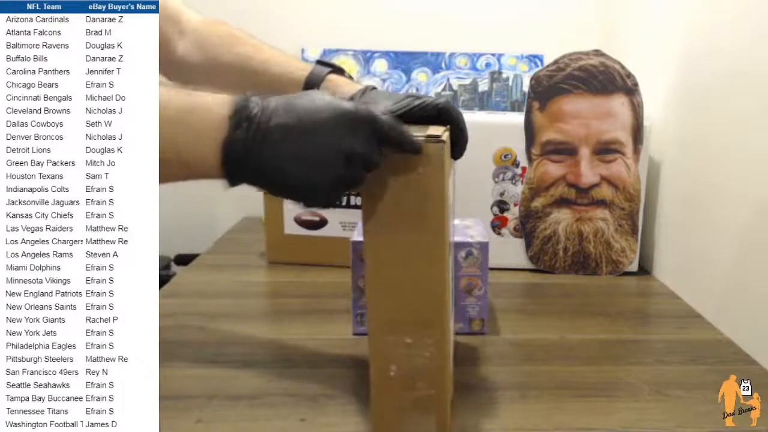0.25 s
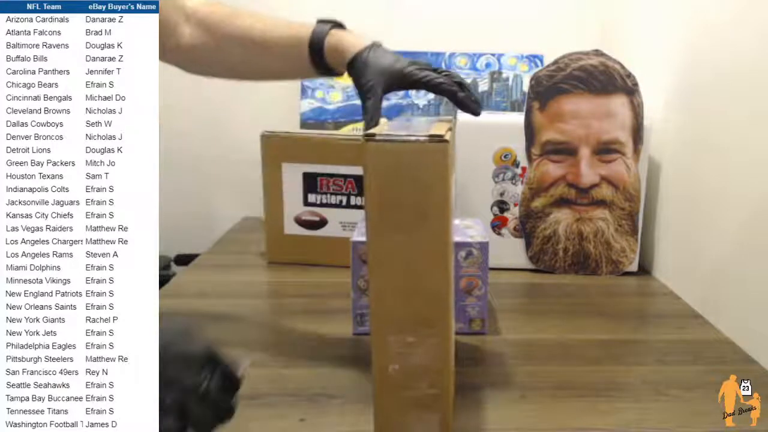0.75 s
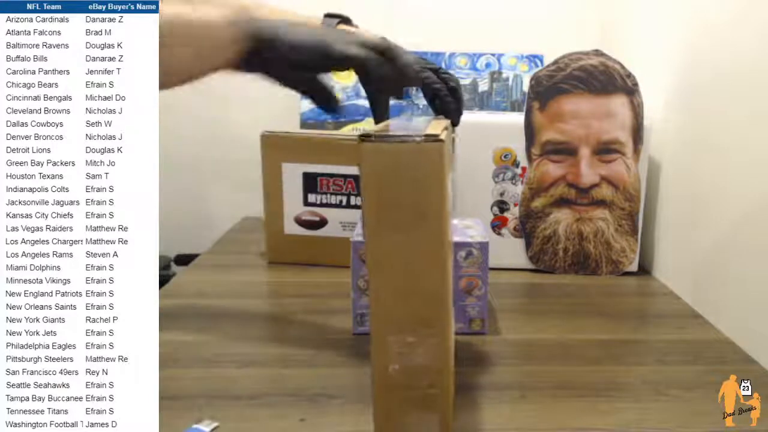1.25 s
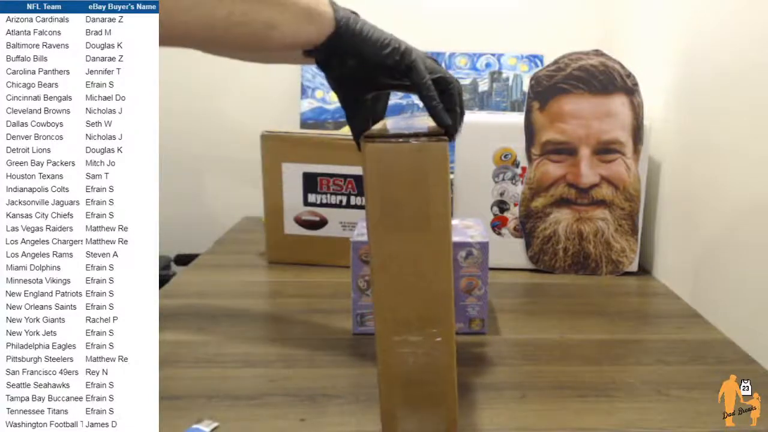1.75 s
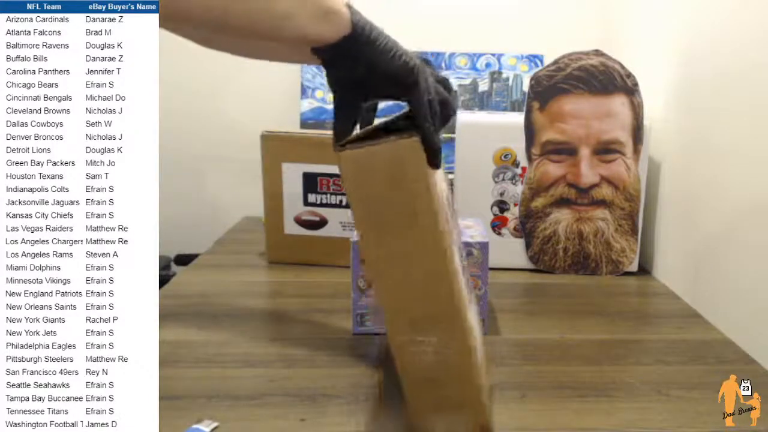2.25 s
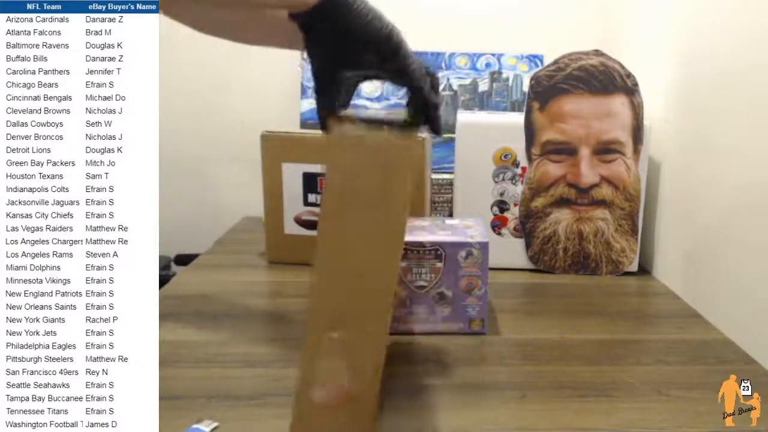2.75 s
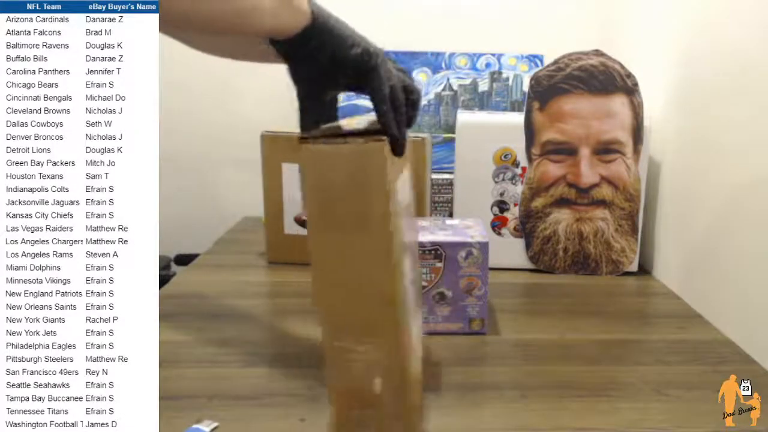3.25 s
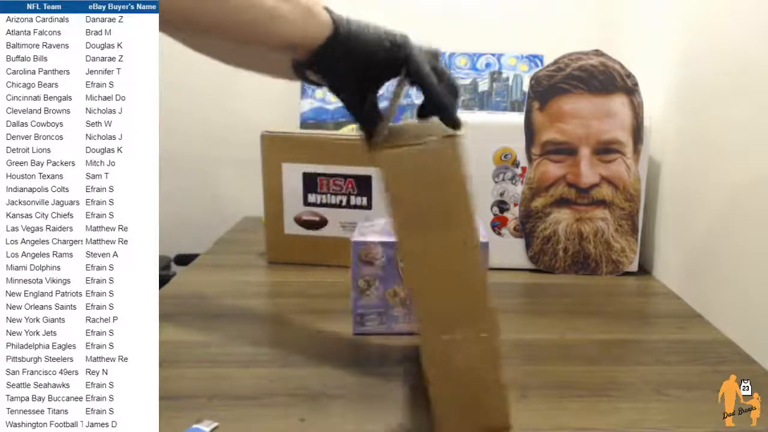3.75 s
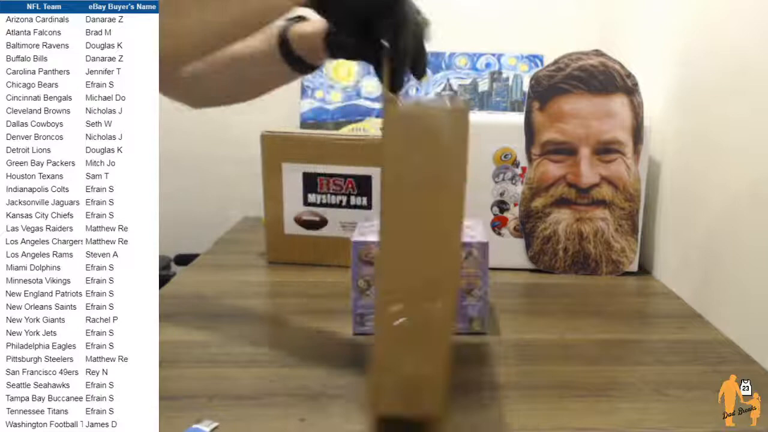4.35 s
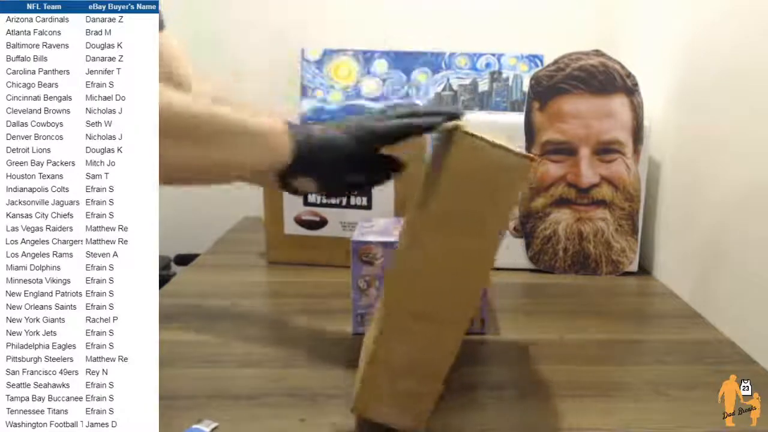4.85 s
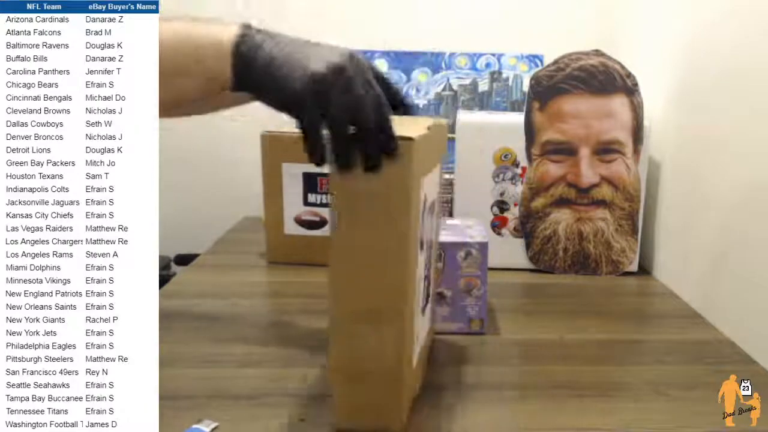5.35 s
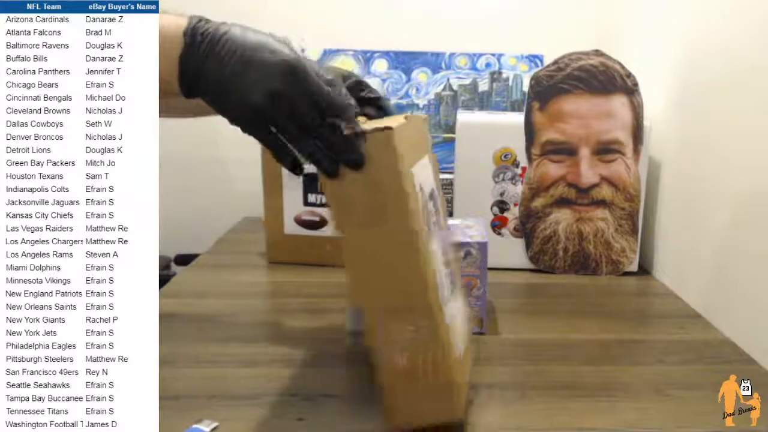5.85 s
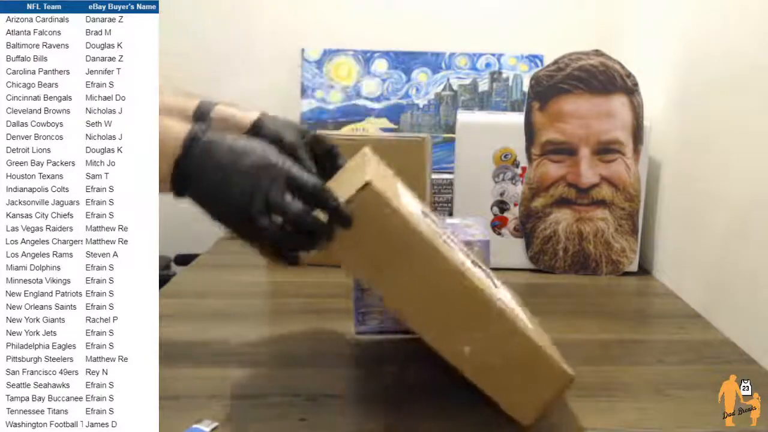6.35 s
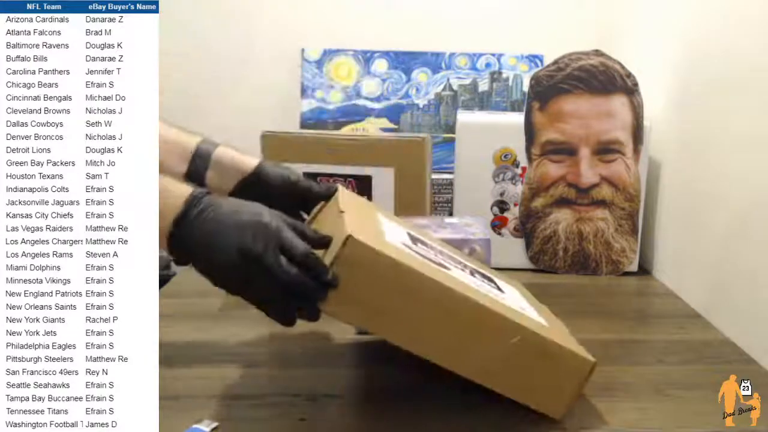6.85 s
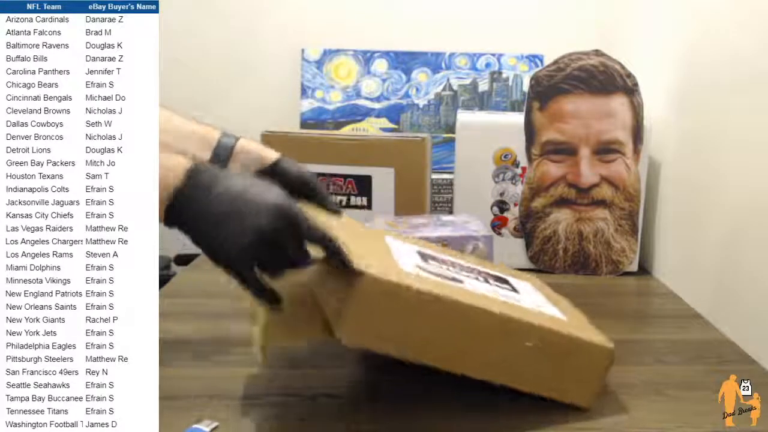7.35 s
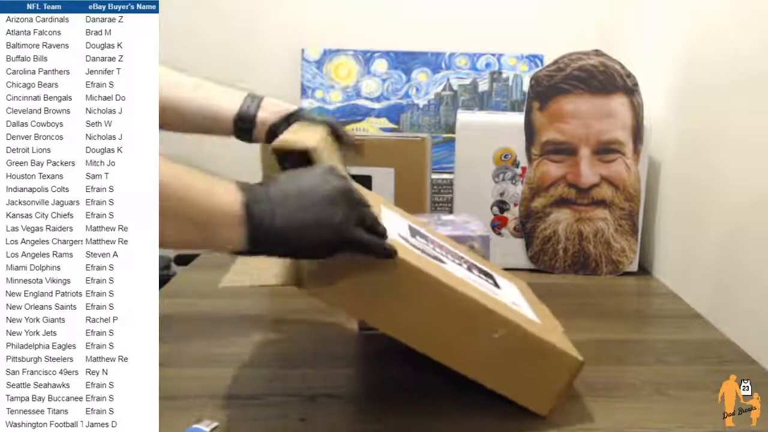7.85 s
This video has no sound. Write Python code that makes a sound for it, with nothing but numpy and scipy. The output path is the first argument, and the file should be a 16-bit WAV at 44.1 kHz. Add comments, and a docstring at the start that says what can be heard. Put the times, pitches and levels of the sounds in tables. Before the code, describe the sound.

Gloved hands shuffle a large cardboard box indoors, with irregular hollow thuds, sharp card cracks, dry scrapes and faint rubbery squeaks.

```python
"""A tall cardboard box, tipped about by gloved hands on a wooden table, knocks: modes, wall notes and clap.
Its end flap is worked open: creases snap and crinkle, and the flap scratches as it is tugged.
Gloves and card rub (filtered random slips), tick, and now and then squeak (narrow gliding noise).
A small room adds decaying noise echoes over a faint hush; two close microphones roll off the treble."""
import sys
import numpy as np
from scipy import signal
from scipy.fft import rfft, irfft, next_fast_len
from scipy.io import wavfile

SR = 44100
rng = np.random.default_rng(int(sys.argv[2]) if len(sys.argv) > 2 else 0)


def to_wav(s):
    """Save 16-bit WAV."""
    ch = np.atleast_2d(s).T  # columns
    pcm = np.round(np.clip(ch, -1, 1) * 32767)  # PCM
    wavfile.write(sys.argv[1], SR, pcm.astype(np.int16))


N = 357651
TIME_S = np.arange(N) / SR

# Box and hands landing: (time [s], hollow thud [dB], panel clap [dB], edge crack [dB],
# contact hardness [dB/octave], struck wall note [Hz], wall level [dB])
KNOCKS = [(0.226, -48, -51, -55.5, -12.5, 310, -51), (0.394, -44, -43, -59, 0.5, 211, -35),
          (0.45, -39, -49, -57, 5, 224, -51), (1.428, -51, -63.5, -67.5, -16, 128, -56),
          (2.54, -42, -88, -58.5, -5.5, 352, -52.5), (2.844, -32.5, -43, -54, -6, 135, -36.5),
          (2.852, -28, -31.5, -47, -5.5, 353, -32), (3.277, -33, -48.5, -74, -4, 133.5, -35),
          (3.617, -27, -28, -30.5, 23, 340.6, -24), (3.627, -27, -35, -55, 2, 218, -36.5),
          (3.652, -29.5, -28.5, -61, -0.5, 742, -40), (3.672, -32.5, -36, -58, -17.5, 662, -44),
          (3.807, -30.5, -31, -52.5, -2, 199, -26), (3.817, -24.5, -38, -62, 9, 397, -32),
          (3.835, -32, -35, -63, -0.5, 206, -36), (4.509, -28, -48, -57, -6, 146, -23),
          (4.516, -25.5, -25, -49, -5, 326, -22.5), (4.597, -37.5, -43.5, -72, -11, 231, -40),
          (5.309, -44, -52.5, -63, -12, 245, -50), (5.496, -40.5, -72, -71, -7.5, 134, -39.5),
          (5.612, -51.5, -44, -60.5, -3, 575, -55.5), (6.141, -39, -49.5, -70, 0, 166, -36.5),
          (6.152, -33.5, -60, -82, -6.5, 285, -36), (6.173, -23.5, -23, -48.5, -1, 199, -28),
          (6.181, -34, -36, -65, 13, 318, -21), (6.203, -45, -36, -55, -1, 600, -41),
          (7.274, -43, -57, -67, -4.5, 240, -39.5), (7.84, -47.5, -55, -68, -4, 212, -47.5)]
# Card creasing, catching, slapped: (time [s], crack [dB], panel clap [dB], wall note [Hz], wall level [dB])
SNAPS = [(0.272, -45, -43, 314, -44), (0.346, -60, -49, 405, -47), (0.424, -46.5, -43.5, 420, -50),
         (1.007, -33.5, -31.5, 390, -45.5), (1.029, -28, -39, 127, -42), (1.04, -22, -32.5, 277, -32.5),
         (1.112, -27, -28.5, 267, -37.5), (1.529, -48.5, -56, 490, -58.5), (1.577, -47, -57.5, 347, -47),
         (1.871, -60.5, -57, 330, -60), (2.329, -60, -50.5, 565, -65), (3.456, -47, -36.5, 347, -41.5),
         (3.462, -50, -48, 207, -47), (3.474, -44, -39.5, 381, -39.5), (3.557, -47.5, -44, 625, -41),
         (3.576, -46.5, -38, 770, -42.5), (3.614, -31.5, -36, 127, -47), (5.94, -36, -37, 308, -40.5),
         (7.114, -31.5, -53, 340, -37.5), (7.121, -36.5, -35, 130, -42), (7.168, -38, -38.5, 290, -33.5),
         (7.905, -67, -51.5, 520, -55), (8.064, -46, -43.5, 330, -56), (8.1055, -22.5, -26.5, 657, -18.5)]
# Flap tugged along its slot, catch by catch: (time [s], scratch [dB], wall note [Hz], wall level [dB])
TUGS = [(5.939, -34.5, 436, -51), (6.764, -38.5, 181, -36), (6.766, -38.5, 343, -31),
        (6.814, -41, 245, -46), (6.855, -45, 352, -44), (6.866, -38.5, 340, -38), (6.875, -53, 213, -33),
        (6.895, -40.5, 348, -39.5), (6.904, -40, 218, -44), (7.003, -41, 211, -39),
        (7.017, -39, 337, -37.5)]
# Thin clicks as glove rubber and tape let go: (time [s], level [dB])
TICKS = [(0.135, -49.5), (0.206, -49.5), (0.403, -40.5), (0.454, -55), (1.054, -35), (2.46, -61),
         (3.762, -52), (7.291, -62), (7.728, -61)]
# Slides of a glove or panel: (start [s], length [s], box drone [dB], card rasp [dB], glove hiss [dB])
STROKES = [(0.252, 0.14, -42.5, -49, -55.5), (0.373, 0.085, -34.5, -45, -49),
           (0.585, 0.049, -61, -60.5, -67.5), (0.715, 0.051, -80, -77, -69),
           (1.377, 0.24, -62.5, -66.5, -71.5), (1.69, 0.077, -62.5, -70.5, -83),
           (1.791, 0.29, -52.5, -57, -62), (2.11, 0.21, -55.5, -55, -59.5),
           (2.458, 0.069, -61, -64.5, -68.5), (3.036, 0.43, -56, -56, -53.5), (3.08, 0.069, -61, -61, -52),
           (3.152, 0.044, -71, -49, -45), (3.241, 0.025, -55, -53, -40), (3.473, 0.11, -45, -53, -64),
           (3.58, 0.058, -37, -38.5, -46.5), (3.7, 0.26, -53.5, -60.5, -66), (4.17, 0.14, -68, -66, -70),
           (4.38, 0.038, -56, -72, -73), (4.552, 0.029, -47, -41, -50), (4.633, 0.11, -56.5, -59.5, -61),
           (5.236, 0.093, -53.5, -57, -63.5), (5.345, 0.13, -61, -53, -60.5),
           (5.759, 0.049, -58, -67.5, -67), (6.076, 0.27, -51, -56, -62), (6.49, 0.32, -53.5, -55, -66),
           (6.608, 0.057, -45, -65, -70), (6.836, 0.058, -48, -48.5, -58), (7.012, 0.27, -53, -54.5, -60.5),
           (7.093, 0.097, -34.5, -37.5, -42), (7.377, 0.23, -57, -54.5, -61.5),
           (7.855, 0.14, -59, -57, -66), (7.992, 0.1, -63, -48, -63)]
# Restless holding hand: (from [s], box drone [dB], card rasp [dB], glove hiss [dB])
GRIP = (2, -67, -69.5, -76)
# Stick-slip squeaks and groans: (middle [s], half length [s], pitch [Hz], glide [octaves/s],
# width [Hz], level [dB])
SQUEAKS = [(1.849, 0.018, 624, -3.5, 260, -50.5), (2.314, 0.045, 561.6, 5.5, 221, -55),
           (3.17, 0.074, 133, 1.5, 44.8, -55.5), (3.999, 0.019, 3190, 0.7, 398, -61),
           (4.304, 0.022, 3530, 1, 500, -65.5), (4.692, 0.0023, 3676, -3, 161.4, -42.5),
           (4.695, 0.0052, 3316, 0, 1630, -46.5), (4.73, 0.056, 3620, 0, 260, -66),
           (4.716, 0.014, 1064, -2, 120, -53), (5.06, 0.16, 790, 0, 71.3, -69.5),
           (5.271, 0.027, 787, -1, 131, -55), (5.619, 0.018, 587, -0.5, 190, -49),
           (5.664, 0.015, 632, -2, 242, -55), (5.915, 0.027, 670, 4.5, 300, -54.5),
           (6.115, 0.062, 798, 1.5, 70, -57), (7.532, 0.015, 330.6, 0.5, 61, -46.5)]

# Resonances of the hollow box: (frequency [Hz], level [dB], T60 [s])
BOX_MODES = [(139.5, -12.5, 0.31), (200, -10, 0.083), (211.5, -6, 0.094), (332, 2, 0.039),
             (343, -4.5, 0.21), (436, -12.5, 0.052), (490, -11, 0.074), (726, -11, 0.094)]
# Resonances of the table under it: (frequency [Hz], level [dB], T60 [s])
TABLE_MODES = [(50, -25.5, 0.41), (87, -18.5, 0.097), (136, -10.5, 0.23), (169.3, -10, 0.25),
               (258, -6, 0.023), (304, -1, 0.12), (447, -3, 0.19), (595, -0.5, 0.04)]

# Colour of clapping panels: (frequency [Hz], level [dB])
PANEL_COLOUR = [(250, -32.5), (420, -3.5), (560, -2), (690, -4), (770, 0.5), (900, -7.5), (1200, -6.5),
                (1600, -11.5), (2800, -22), (4000, -31), (8000, -74.5)]
# Colour of cracking card: (frequency [Hz], level [dB])
CRACK_COLOUR = [(600, -31.5), (1400, -6), (2300, 3), (3200, 0), (5700, 1.5), (7000, -2), (9000, -11),
                (15000, -17.5)]
# Colour of a bending fold: (frequency [Hz], level [dB])
CREASE_COLOUR = [(300, -9.5), (500, 2), (750, -4), (950, -5.5), (1300, -1.5), (1800, -5), (2300, -12),
                 (3200, -11), (8000, -29)]
# Colour of the flap: (frequency [Hz], level [dB])
FLAP_COLOUR = [(300, -3.5), (700, 3), (1000, 0), (1200, 6), (1450, -4.5), (2450, -3), (2850, 2.5),
               (3200, -5), (4200, -7), (5500, -6.5), (7500, -9), (12000, -24)]
# Colour of the ticks: (frequency [Hz], level [dB])
TICK_COLOUR = [(1000, -5), (4000, -11), (6500, 2)]
# Colour of rubbed card: (frequency [Hz], level [dB])
RASP_COLOUR = [(330, -13), (520, -1), (660, -5.5), (770, 1.5), (1150, -2.5), (1600, -5.5), (2300, -9),
               (3500, -10), (7000, -34)]
# Colour of rubbing gloves: (frequency [Hz], level [dB])
HISS_COLOUR = [(1000, -16.5), (2200, 3.5), (3200, -2), (4500, 2.5), (7100, 2), (9000, -4), (13000, -40.5)]
# Colour of the room's hush: (frequency [Hz], level [dB])
HUSH_COLOUR = [(25, -10.5), (48, -4.5), (112, -4), (160, -11.5), (400, -12), (750, -17.5), (3000, -29.5),
               (8000, -33.5), (10000, -47.5)]

# Echo decay: (frequency [Hz], T60 [s])
ROOM_T60 = [(100, 0.36), (300, 0.21), (800, 0.37), (2000, 0.32), (5000, 0.32), (8000, 0.27)]
# Likeness of the two channels: (frequency [Hz], left-right correlation [1])
LIKENESS = [(60, 0.89), (250, 0.99), (600, 0.92), (1000, 0.77), (1900, 0.024), (4800, 0.058), (6000, 0.91)]
# Difference of the two microphones: (frequency [Hz], left minus right [dB])
BALANCE = [(60, -2.5), (300, 0), (1500, 0), (2800, -2.5), (8000, -1.5)]
# Response of both microphones: (frequency [Hz], gain [dB])
MICROPHONE = [(20, -8), (48, -1), (7250, 1), (8500, -10.5), (9100, -31.5), (16000, -42.5)]

HUSH_DB, HUSH_WAVER_DB, HUSH_WAVER_PER_S = -65, 2.1, 9
CUTOFF_HZ = 15500  # stopband edge
PORT_LAG_S = 0.00014  # right microphone is nearer to the box

STROKE_ATTACK_S, STROKE_RELEASE_S = 0.013, 0.0041  # before easing; release is a time constant
STROKE_EASE = 0.2  # share of stroke length added to both
GRIP_SHIFTS_PER_S, GRIP_SHIFT_DB = 12, 4
FLEX_PER_S, DRONE_FLEX, RASP_FLEX = 15, 0.0505, 0.076  # pressure changes; retuning shares
SCRATCHES_PER_S, SCRATCH_DB = 40, -7.5  # card ridges catching; level re rasp

WALL_T60_S, WALL_RISE_S = 0.052, 0.0034
WALL_ROUGH_RAD, WALL_ROUGH_PER_S = 0.54, 160  # loose layers jolt the phase
WALL_CUT_HZ = 196  # thin walls alone radiate little below this
CONTACT_DB = -9  # first sharp contact of a knock, re panel clap
SNAP_BODY_DB = -1  # rest of the box, re shaken wall
CRINKLE_PER_S, CRINKLE_T60_S, CRINKLE_DB = 120, 0.14, -22  # fibres settling; level re crack
FLAP_T60_S, FLAP_RISE_S = 0.09, 0.0032  # a wall twanged by the flap swings more freely
CREAK_T60_S, CREAK_DB = 0.099, -11  # hinge fold creaking on; level re scratch


def from_db(db):
    """Decibels to gain."""
    return 10 ** (np.asarray(db) / 20)


def rms_one(x):
    """Scale to unit rms."""
    return x / np.sqrt(np.mean(x ** 2) + 1e-20)


def unit_blow(sound):
    """Scale so that the first 20 ms have unit rms."""
    return sound / np.sqrt(np.mean(sound[:, :SR // 50] ** 2) + 1e-20)


def at_hz(points, hz):
    """Interpolate a table on a log-frequency axis."""
    f, value = np.transpose(points)
    return np.interp(np.log(np.maximum(hz, 1)), np.log(f), value)


def colour(x, spectrum, size=8192):
    """Causal minimum-phase filter with the given spectrum, by folding the cepstrum."""
    gain = from_db(at_hz(spectrum, np.fft.rfftfreq(size, 1 / SR)))
    cepstrum = irfft(np.log(gain))
    cepstrum[1:size // 2] *= 2
    cepstrum[size // 2 + 1:] = 0
    impulse = irfft(np.exp(rfft(cepstrum)))
    return signal.fftconvolve(x, impulse[None], axes=-1)[:, :x.shape[-1]]


def at_ports(pair):
    """Mix two unrelated signals into a left and right with the correlation in LIKENESS."""
    length = pair.shape[-1]
    size = next_fast_len(length)
    mid, side = rfft(pair, size)
    alike = np.clip(at_hz(LIKENESS, np.fft.rfftfreq(size, 1 / SR)), -.99, .99)
    common = np.sqrt((1 + alike) / 2) * mid
    opposed = np.sqrt((1 - alike) / 2) * side * [[1], [-1]]
    return irfft(common + opposed, size)[:, :length]


def noise(size):
    """White noise, correlated between the microphones by LIKENESS."""
    return at_ports(rng.standard_normal((2, size)))


def drift(rate_per_s):
    """Straight lines between normal random values drawn at the given rate."""
    return np.interp(TIME_S * rate_per_s, np.arange(N // 20), rng.standard_normal(N // 20))


def add(track, s, sound):
    """Lay a sound into a track at a time."""
    start = int(np.clip(s * SR, 0, N - 1))
    track[:, start:start + sound.shape[-1]] += sound[:, :N - start]


def hush():
    """Steady coloured noise of the room, its level wavering a little."""
    gain = from_db(HUSH_DB + HUSH_WAVER_DB * drift(HUSH_WAVER_PER_S))
    return gain * rms_one(colour(noise(N), HUSH_COLOUR))


def room(x, wet):
    """Diffuse echoes: noise bands that set in after 3 ms and die away each at its own rate."""
    t = TIME_S[:SR * 3 // 4]
    white = noise(len(t)), noise(len(t))
    tail = 0
    edges_hz = np.geomspace(40, 8500, 13)
    for k, (low, high) in enumerate(zip(edges_hz, edges_hz[1:])):
        hz = np.sqrt(low * high)
        bandpass = signal.butter(2, [low, high], "band", fs=SR, output="sos")
        band = signal.sosfilt(bandpass, white[k % 2])
        onset = np.clip((t - .003) / 0.00026, 0, 1)
        fade = from_db(-60 * t / at_hz(ROOM_T60, hz)) * onset
        tail = tail + band * fade / np.sqrt(np.sum(fade ** 2)) * from_db(at_hz(wet, hz))
    return signal.fftconvolve(x, tail, axes=-1)[:, :N]


def rattle(spectrum, t60, rise, grain_db):
    """Burst of uneven micro-contacts, coloured by the countless damped modes of the card."""
    t = TIME_S[:SR // 6]
    unevenness = np.clip(rng.standard_normal(len(t)), -2, 2)
    contacts = noise(len(t)) * from_db(grain_db * unevenness)
    envelope = (1 - np.exp(-t / rise)) * from_db(-60 * t / t60)
    return unit_blow(colour(contacts * envelope, spectrum))


def ringing(modes, hardness, detune, held_t60):
    """Modes struck once, damped further by the holding hand; a soft contact favours the lowest."""
    t = TIME_S[:SR // 3]
    hz, db, t60 = np.transpose(modes)[:, :, None]
    grip = 1 + detune * rng.standard_normal(hz.shape)  # the holding hand detunes the modes
    tilt = hardness * np.log2(hz / 400)
    db = db + np.where(hz < 400, tilt, np.minimum(tilt, 0))
    strength = from_db(db) * rng.choice([-1, 1], hz.shape)
    decay = from_db(-60 * (t / t60 + t / held_t60))
    swings = strength * np.sin(2 * np.pi * hz * grip * t) * decay
    return unit_blow(np.sum(swings, axis=0)[None])


def wall(hz, t60, rise):
    """One box wall swings briefly and unevenly at its own note, set by where the hand holds it."""
    t = TIME_S[:SR // 3]
    jolts = np.interp(t * WALL_ROUGH_PER_S, np.arange(SR // 20), rng.standard_normal(SR // 20))
    swing = np.sin(2 * np.pi * hz * t + WALL_ROUGH_RAD * (jolts - jolts[0]))
    envelope = (1 - np.exp(-t / rise)) * from_db(-60 * t / t60)
    return unit_blow((swing * envelope)[None])


def squeaks():
    """Rubber and card stick and slip at a gliding pitch; the narrower the width, the purer the tone."""
    out = np.zeros((2, N))
    t = TIME_S[:SR] - 1 / 2
    for s, half_length_s, hz, glide, width_hz, db in SQUEAKS:
        r = np.exp(-np.pi * abs(width_hz) / SR)
        white = rng.standard_normal((2, SR)) + 1j * rng.standard_normal((2, SR))
        waver = signal.lfilter([1], [1, -2 * r, r * r], white)  # noise narrowed around 0 Hz
        carrier = np.exp(2j * np.pi * np.cumsum(hz * 2 ** (glide * t)) / SR)
        swell = np.exp(-(t / half_length_s) ** 2 / 2)
        tone = at_ports(np.real(waver * carrier) * swell)
        add(out, s + t[0], from_db(db) * rms_one(tone) * np.sqrt(np.mean(swell ** 2)))
    return out


def slips(per_s, spread_db, smooth_db):
    """Friction: tiny slips of uneven size at random moments, over a smooth hiss."""
    sizes = from_db(spread_db * np.minimum(rng.exponential(1, N), 4))
    grains = (rng.random(N) < per_s / SR) * sizes * rng.standard_normal((2, N))
    smooth = from_db(smooth_db) * rng.standard_normal((2, N))
    return at_ports(rms_one(grains) + smooth)


def scratches():
    """Separate catches at random moments, each a short spray of slips; unit rms."""
    catches = (rng.random(N) < SCRATCHES_PER_S / SR) * rng.random(N)
    # 2 ms decay
    spray = signal.lfilter([1], [1, -np.exp(-1 / (0.002 * SR))], catches + 1e-18)
    return rms_one(colour(spray * noise(N), CREASE_COLOUR))


def flexed(x, share):
    """Card resonances wander with hand pressure: playback runs slightly fast and slow."""
    leak = np.exp(-2 * np.pi / SR)
    lead = signal.lfilter([1], [1, -leak], share * drift(FLEX_PER_S))  # [samples]
    return np.array([np.interp(np.arange(N) + lead, np.arange(N), side) for side in x])


def stroke_shape(start, length):
    """A slide gets going, holds and dies away; long ones start and stop gently."""
    t = TIME_S - start
    ease = STROKE_EASE * length
    attack = np.clip(t / (STROKE_ATTACK_S + ease), 0, 1)
    return attack * np.exp(-np.clip((t - length) / (STROKE_RELEASE_S + ease), 0, 20))


def sliding_gains():
    """Gains of drone, rasp and hiss: strokes add in power to the restless grip."""
    held_from, *grip_db = GRIP
    onset = np.clip((TIME_S - held_from) / STROKE_ATTACK_S, 0, 1)
    grip = onset * from_db(GRIP_SHIFT_DB * drift(GRIP_SHIFTS_PER_S))
    power = np.outer(from_db(grip_db), grip) ** 2
    for start, length, *levels_db in STROKES:
        power += np.outer(from_db(levels_db), stroke_shape(start, length)) ** 2
    return np.sqrt(power)


def rubbing():
    """Slips drive box drone, card rasp and glove hiss under shared pressure; the rasp judders and catches."""
    drone_gain, rasp_gain, hiss_gain = sliding_gains()
    # the pressing hand damps the box
    hollow = ringing(BOX_MODES, hardness=3.7, detune=0, held_t60=0.34)
    driven = signal.fftconvolve(slips(900, 0.92, -11.0), hollow, axes=-1)[:, :N]
    drone = drone_gain * rms_one(flexed(driven, DRONE_FLEX))
    coarse, fine = slips(800, 2.3, -5), slips(1600, 2.2, -3)
    card = rms_one(colour(coarse, RASP_COLOUR)) + from_db(SCRATCH_DB) * scratches()
    judder = from_db(1.8 * drift(35))
    rasp = rasp_gain * rms_one(flexed(card, RASP_FLEX) * judder)
    hiss = hiss_gain * rms_one(colour(fine, HISS_COLOUR))
    pressure = from_db(1.1 * drift(90))
    return (drone + rasp + hiss) * pressure


def ticks():
    """Small bright clicks that leave the box still."""
    out = np.zeros((2, N))
    for s, db in TICKS:
        add(out, s, from_db(db) * rattle(TICK_COLOUR, t60=0.018, rise=0.00017, grain_db=3))
    return out


def tugs():
    """Each catch of the flap scratches in the flap's resonances, creaks the fold and twangs a wall."""
    out = np.zeros((2, N))
    for s, scratch_db, wall_hz, wall_db in TUGS:
        scratch = rattle(FLAP_COLOUR, t60=0.049, rise=0.0004, grain_db=7.0)
        creak = rattle(CREASE_COLOUR, CREAK_T60_S, FLAP_RISE_S, grain_db=22.5)
        add(out, s, from_db(scratch_db) * scratch)
        add(out, s, from_db(scratch_db + CREAK_DB) * creak)
        add(out, s, from_db(wall_db) * wall(wall_hz, FLAP_T60_S, FLAP_RISE_S))
    return out


def crinkle():
    """Dying run of separate tiny cracks, with the energy of a 20 ms unit blow."""
    t = TIME_S[:SR // 6]
    moments = rng.random(len(t)) < CRINKLE_PER_S / SR
    cracks = moments * noise(len(t)) * from_db(-60 * t / CRINKLE_T60_S)
    return rms_one(colour(cracks, CRACK_COLOUR)) * np.sqrt((SR // 50) / len(t))


def snaps():
    """Creases let go abruptly, shake the hollow box and crinkle as they settle."""
    out = np.zeros((2, N))
    thin = signal.butter(2, WALL_CUT_HZ, "high", fs=SR, output="sos")
    for s, crack_db, clap_db, wall_hz, wall_db in SNAPS:
        crack = rattle(CRACK_COLOUR, t60=0.032, rise=0.00024, grain_db=12.5)
        crack = crack + from_db(CRINKLE_DB) * crinkle()
        clap = rattle(CREASE_COLOUR, t60=0.08, rise=0.00043, grain_db=4.5)
        body = signal.sosfilt(thin, ringing(BOX_MODES, hardness=1.7, detune=0.063, held_t60=0.5))
        shaken = wall(wall_hz, WALL_T60_S, WALL_RISE_S) + from_db(SNAP_BODY_DB) * body
        add(out, s, from_db(crack_db) * crack)
        add(out, s, from_db(clap_db) * clap)
        add(out, s, from_db(wall_db) * shaken)
    return out


def knocks():
    """A landing: sharp contact, box and table thud, struck wall rings, panels clap, edge cracks."""
    out = np.zeros((2, N))
    contact = unit_blow(colour(signal.unit_impulse((1, SR // 6)), PANEL_COLOUR))
    for s, thud_db, clap_db, crack_db, hardness, wall_hz, wall_db in KNOCKS:
        thud = ringing(BOX_MODES + TABLE_MODES, hardness, detune=0.04, held_t60=0.25)
        panels = rattle(PANEL_COLOUR, t60=0.064, rise=0.00095, grain_db=4.5)
        clap = unit_blow(panels - from_db(CONTACT_DB) * contact)
        crack = rattle(CRACK_COLOUR, t60=0.054, rise=0.00061, grain_db=0.0)
        add(out, s, from_db(thud_db) * thud)
        add(out, s, from_db(wall_db) * wall(wall_hz, WALL_T60_S, WALL_RISE_S))
        add(out, s, from_db(clap_db) * clap)
        add(out, s, from_db(crack_db) * crack)
    return out


def scene():
    """Blows off to one side (left lags), friction straight ahead, echoes of both, and the hush."""
    blows = knocks() + snaps() + tugs() + ticks()
    friction = rubbing() + squeaks()
    late_left = np.interp(TIME_S - PORT_LAG_S, TIME_S, blows[0])
    direct = np.vstack([late_left, blows[1]]) + friction
    # wet: (frequency [Hz], level [dB])
    echoes = room(blows + friction, wet=[(100, -2.0), (400, -3.0), (1200, -5.0), (5000, -7.0)])
    return direct + echoes + hush()


def record(dry):
    """Two slightly different microphones fall off steeply in the treble and round the loudest peaks."""
    left = colour(dry[:1], [(hz, db / 2) for hz, db in BALANCE])
    right = colour(dry[1:], [(hz, -db / 2) for hz, db in BALANCE])
    heard = np.tanh(colour(np.vstack([left, right]), MICROPHONE))
    lowpass = signal.cheby2(12, 70, CUTOFF_HZ, fs=SR, output="sos")
    return signal.sosfilt(lowpass, heard)


dry = scene()
out = record(dry)
to_wav(out)
```